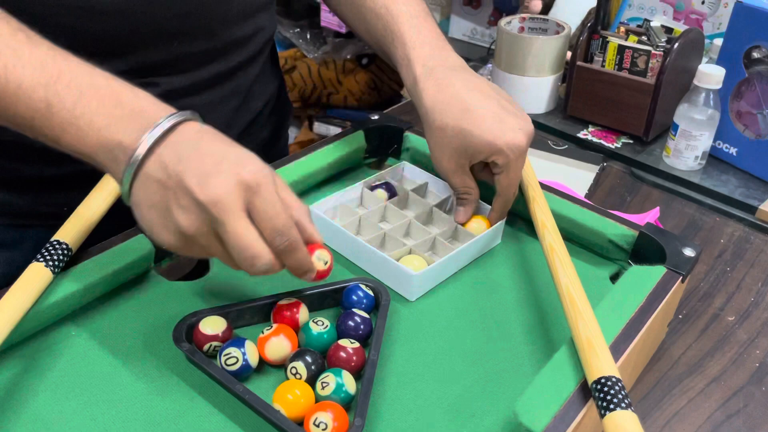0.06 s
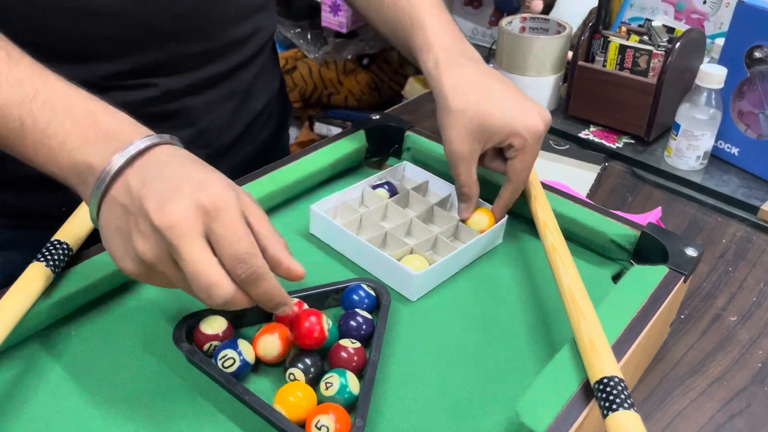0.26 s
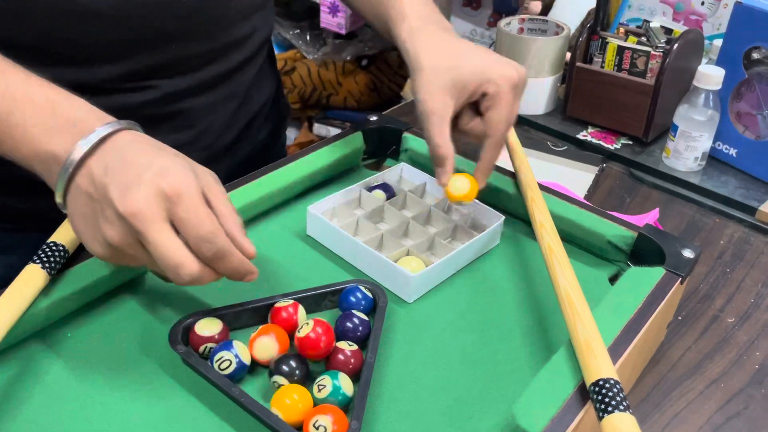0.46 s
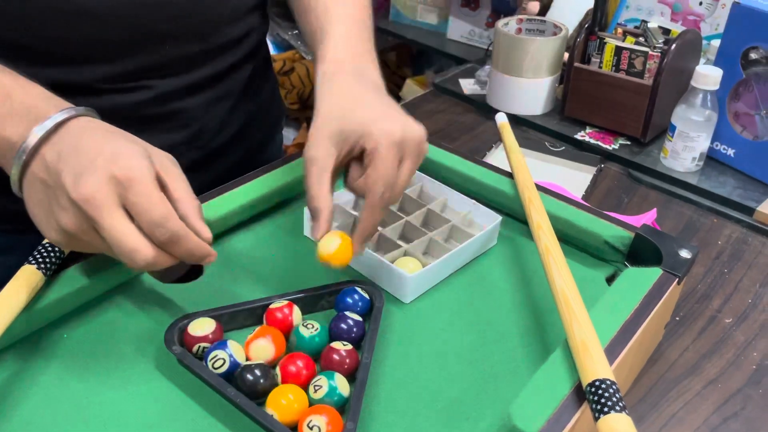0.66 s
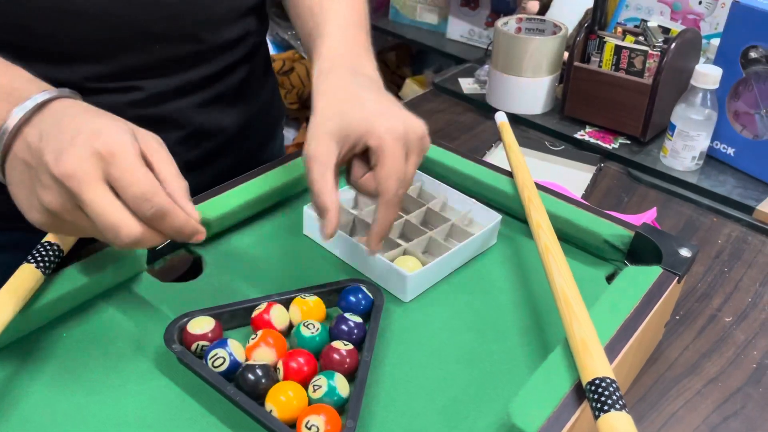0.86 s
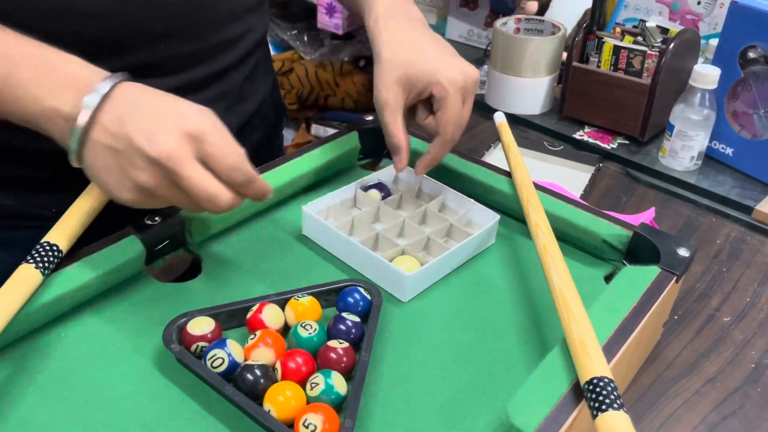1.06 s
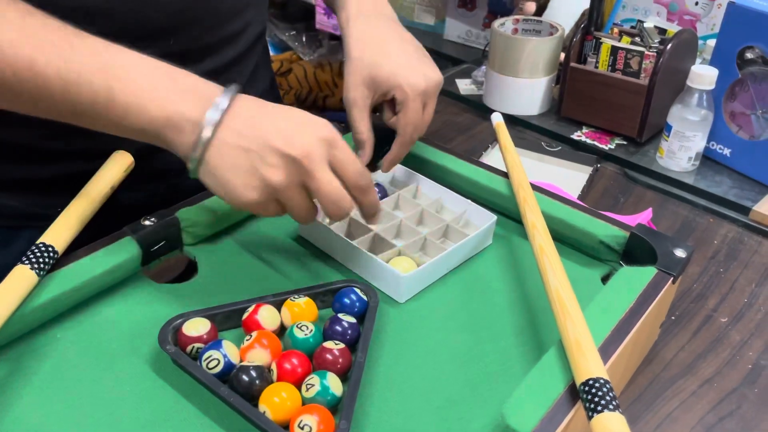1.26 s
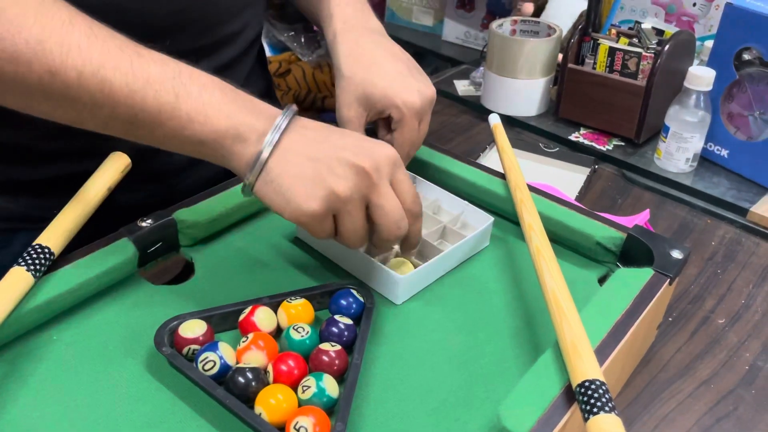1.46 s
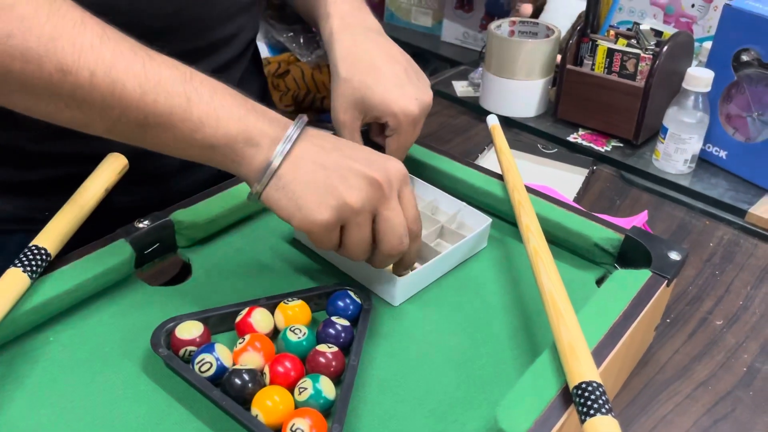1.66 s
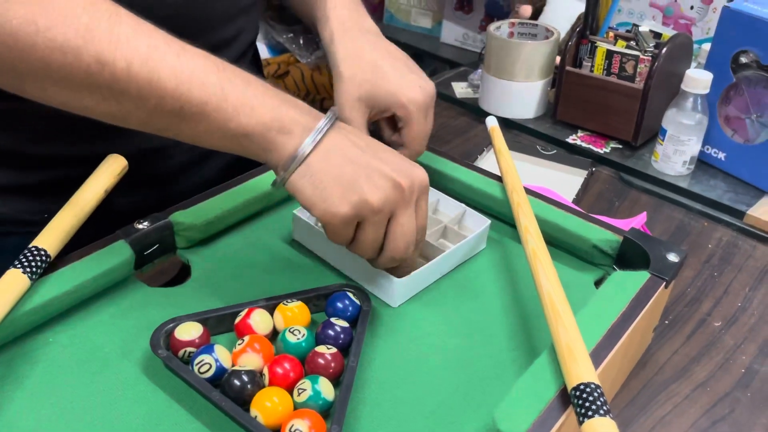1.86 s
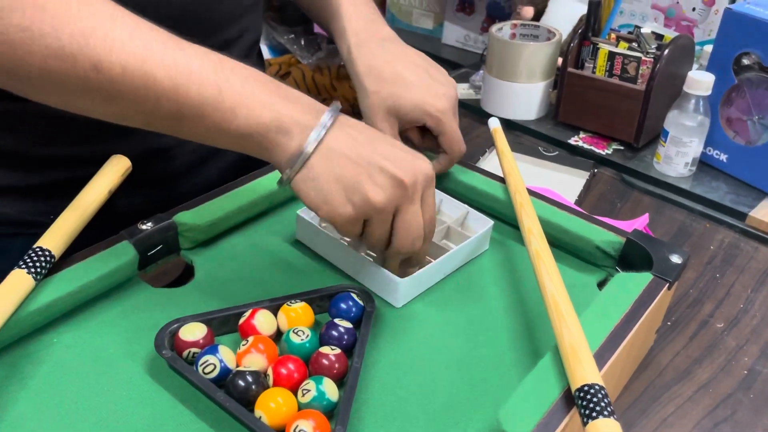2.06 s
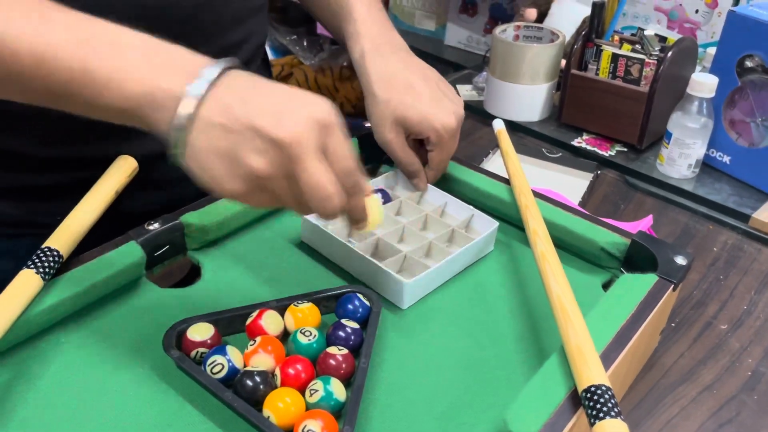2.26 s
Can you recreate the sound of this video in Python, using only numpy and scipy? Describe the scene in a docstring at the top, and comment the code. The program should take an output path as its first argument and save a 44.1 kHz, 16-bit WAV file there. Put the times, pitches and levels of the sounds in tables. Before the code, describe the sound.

Close by in a small room, little billiard balls drop into a plastic rack with sharp clicks and thumps, slightly left. Afterwards, fingers softly rub and tap cardboard dividers in a box, over a low room rumble.

```python
"""Small pool balls drop into a plastic rack on a toy table, close to a stereo microphone in a small room.
Each ball clicks on its neighbours, thumps the cloth-covered board and rattles the rack, a little left.
Then, just right of centre, fingers rummage for the next ball among the cardboard dividers of a box,
rubbing, tapping and scraping. A low room rumble lies under it all."""
import sys
import numpy as np
from scipy import signal
from scipy.fft import rfft, irfft, next_fast_len
from scipy.io import wavfile
from scipy.ndimage import uniform_filter1d, minimum_filter1d, map_coordinates

SR = 44100
rng = np.random.default_rng(int(sys.argv[2]) if len(sys.argv) > 2 else 0)


def generate_wav(signal):
    """Clip the signal to [-1, 1] and save it as 16-bit WAV at the path in sys.argv[1]."""
    frames = np.transpose(np.atleast_2d(signal))
    scaled = np.clip(frames, -1, 1) * 32767
    pcm = np.round(scaled).astype(np.int16)
    wavfile.write(sys.argv[1], SR, pcm)


N = 105840

# room tone, mid spectrum and side relative to mid: f/Hz, level/dB
RUMBLE_MID = [(15, -28), (25, -16), (38, -16.5), (54, -7), (75, -9.5), (110, -27.5), (180, -33.5),
              (300, -41), (450, -50), (780, -52.5), (1100, -57.5), (3000, -59.5), (5500, -73.5),
              (8000, -68.5), (12000, -70.5), (16000, -90.5)]
RUMBLE_SIDE = [(30, -16.5), (150, -12.5), (500, 2), (3000, -6)]
# reverberation: f/Hz, T60/s
ROOM_DECAY = [(150, .18), (500, .16), (1200, 0.15), (3000, 0.18), (7000, 0.15), (14000, 0.15)]

# ball on ball, ball on rack: t/s, relative level/dB, treble corner/Hz
BALL_CLICKS = [(.2204, -5.5, 8770), (.2251, -10, 8070), (.3770, -25, 5040), (.6018, -24, 11080),
               (.7604, -14, 12500), (.7615, -1.5, 9700), (.7625, -26.5, 7000), (.7873, -24.5, 5850),
               (.8041, -28.5, 7190)]
RACK_RATTLES = [(.2425, -14, 12000), (.3958, -30, 6360), (.4060, -38.5, 3155), (.5235, -55, 5000),
                (.6020, -12, 2300), (.6155, -18, 12000), (.6185, -24.5, 7000), (.6305, -29, 3870),
                (.7650, -17, 8996), (.7860, -15.5, 6500), (.7915, -19.5, 4500), (.8090, -12, 2500),
                (.8150, -26.5, 10000), (.8925, -68, 3970)]
# ball on board: t/s, relative level/dB, treble corner/Hz,
# travel time at 1 kHz direct/ms and via the rim/ms, gain of the rim path
BOARD_LANDINGS = [(0.2216, 5, 1202, 2.32, 3.65, 0.18), (0.3777, -10.5, 580, 2.5, 4.84, 0.4),
                  (0.6018, 2.5, 2400, 2.1, 3.49, .9), (0.6283, -14, 605, 2.9, 4.2, .5),
                  (0.7632, -1.5, 907, 2.2, 3.595, 0.5), (0.8079, 3.5, 2400, 2.12, 4.38, 0.2)]
# rubbing on cardboard, envelope: t/s, level/dB
RUB_ENVELOPE = [(1.36, -100), (1.431, -60.5), (1.484, -108), (1.551, -62.5), (1.59, -57.5), (1.646, -59.5),
                (1.669, -54.5), (1.72, -58.5), (1.764, -58), (1.803, -53), (1.838, -65.5), (1.875, -50),
                (1.929, -76), (1.999, -70), (2.03, -56.5), (2.09, -55.5), (2.151, -82), (2.349, -83),
                (2.4, -62)]
# fingers and ball on the box: t/s, relative level/dB, treble corner/Hz, divider pitch/Hz
BOX_TAPS = [(1.423, -41, 1500, 439), (1.510, -43.5, 14500, 1300), (1.540, -30.5, 4000, 320),
            (1.610, -38, 800, 662), (1.656, -36, 9000, 620), (1.867, -35, 1480, 235),
            (2.019, -27, 700, 420), (2.047, -40, 4100, 2680), (2.076, -42, 6000, 930),
            (2.088, -27, 1837, 497), (2.117, -25.5, 1780, 382), (2.236, -40.5, 4620, 2046)]
# strokes along a divider: t/s, hold/s, level/dB
DIVIDER_SCRAPES = [(1.784, 0.019, -55), (2.008, 0.072, -55)]

# modes of board, rack and hollow box: f/Hz, width/Hz, level/dB
BOARD_MODES = [(189.6, 39, -0.5), (237.5, 39, 0.15), (340.7, 18, -1.5), (380, 27, -2), (455, 40, -2),
               (569.6, 92, -4), (686.5, 83, -3.5), (822, 40, -8), (897, 35, -6), (1017, 97, -8.5),
               (1109, 108.5, -4.5), (1299, 75, -10), (1536, 83, -13), (2165, 72, -22)]
RACK_MODES = [(2150, 90, -4.5), (2370, 44, -0.5), (3030, 140, -2), (3520, 130, 6), (4000, 76, -6),
              (4530, 200, 1), (6520, 200, 3.5)]
BOX_MODES = [(231, 75, 8), (332.2, 30, 5), (413, 46, 6), (652, 95, 1), (1057, 170, 0), (1390, 66, 1.5),
             (1767, 94, -0.5), (2100, 41, -6.5), (2450, 130, -5.5), (3220, 110, -8)]
# broad spectrum of each kind of contact: f/Hz, level/dB
CLICK_SPECTRUM = [(500, -28.5), (1900, -15), (3000, -7.5), (5000, -2.5), (6700, -1), (10000, -4.5),
                  (16000, -11.5)]
RATTLE_SPECTRUM = [(300, -10), (1000, 8), (2200, 4), (3400, 1), (4500, -1.5), (5400, -13.5), (6600, -10),
                   (10000, -7.5), (16000, -17)]
RUB_SPECTRUM = [(100, -8), (200, 6.5), (400, -2), (1500, -6.5), (3000, -11), (5000, -21.5), (6500, -17.5),
                (12000, -24.5), (16000, -37.5)]
TAP_SPECTRUM = [(100, -9), (220, 9), (400, 4), (700, -1.5), (1500, 1), (2500, -1.5), (3500, -1.5),
                (6500, -15), (12000, 4.5), (16000, -13)]
SCRAPE_SPECTRUM = [(500, -7.5), (1500, -2.5), (2500, 5), (4000, -3.5), (5000, -12.5), (6500, -2),
                   (8000, -20), (10500, -6.5), (13000, -14), (16000, -27.5)]

# the table at the microphone: f/Hz, left over right/dB
TABLE_BALANCE = [(60, -1), (110, .3), (380, .6), (700, 3.5), (1200, 6.5), (2380, 2.3), (4400, 3.3),
                 (8000, .3), (15000, .5)]
# the same in phase: f/Hz, left lead/rad
TABLE_LEAD = [(100, 0), (350, .2), (1200, .6), (2800, 1.1), (6000, 1.2), (10000, 2), (14000, 2.4)]
# microphone response: f/Hz, gain/dB
MIC_RESPONSE = [(6800, 2), (7400, -3), (8000, -16.5), (9000, -7), (9900, -1), (13000, -1.5), (16000, -7)]

TIME = np.arange(N) / SR
BLOW_SAMPLES = 8192
BLOW_HZ = np.fft.rfftfreq(BLOW_SAMPLES, 1 / SR)


def amp(db):
    """Decibels to gain."""
    return 10 ** (np.asarray(db) / 20)


def unit(x):
    """Scale to rms 1."""
    return x / np.sqrt(np.mean(x ** 2) + 1e-20)


def along(points, hz):
    """Read (f/Hz, value) points on a log axis."""
    f, values = np.transpose(points)
    return np.interp(np.log(hz + 1), np.log(f + 1), values)


def filtered(x, response):
    """Filter x by a complex function of frequency."""
    size = next_fast_len(N + SR // 2)
    return irfft(rfft(x, size) * response(np.fft.rfftfreq(size, 1 / SR)), size)[..., :N]


def causal(gain):
    """The minimum-phase response with this gain."""
    cepstrum = irfft(np.log(np.maximum(gain, 1e-6)))
    half = len(cepstrum) // 2
    cepstrum[1:half] *= 2
    cepstrum[half + 1:] = 0
    return np.exp(rfft(cepstrum))


def add(track, s, sound):
    """Mix a sound in at time s."""
    part = track[max(round(s * SR), 0):][:len(sound)]
    part += sound[:len(part)]


def resonances(modes, hz):
    """Gain of a set of modes, summed in power."""
    return np.sqrt(sum(amp(2 * db) / (1 + ((hz - f) / (0.68 * width)) ** 2) ** 2
                       for f, width, db in modes))


def body(colour, modes, hz):
    """Gain of an object: a broad colour with its modes on top."""
    return np.hypot(amp(along(colour, hz)), resonances(modes, hz))


def contacts(rows, colour, modes, t60_s, scatter_db=3):
    """Each contact is a fast-dying burst that rings the object; a lower corner makes it duller."""
    out = np.zeros(N)
    decay = amp(-60 * TIME[:BLOW_SAMPLES] / t60_s)
    for s, db, corner_hz in rows:
        burst = rfft(rng.standard_normal(BLOW_SAMPLES) * decay)
        smooth_power = np.abs(uniform_filter1d(np.abs(burst) ** 2, size=200))
        flat_burst = burst / causal(np.sqrt(smooth_power))
        struck = [(f, width, level + rng.normal(0, scatter_db)) for f, width, level in modes]
        gain = body(colour, struck, BLOW_HZ) / np.sqrt(1 + (BLOW_HZ / corner_hz) ** 4)
        add(out, s, amp(db + 12) * irfft(flat_burst * causal(gain))[:len(BLOW_HZ)])
    return out


def friction(colour, modes, grain_db=2.8, grains_per_s=350):
    """Grainy sliding noise of rms 1 in an object's colour."""
    noise = rng.standard_normal(N)
    roughness = map_coordinates(rng.standard_normal(4096), [TIME * grains_per_s], mode="wrap")
    grains = noise * amp(grain_db * roughness)
    return unit(filtered(grains, lambda hz: body(colour, modes, hz)))


def room(x, wet_db, renew_s=0.2, build_s=0.005):
    """Direct sound plus a short diffuse stereo room tail, drawn afresh every 0.2 s."""
    out = np.array([x, x])
    step = round(renew_s * SR)
    for start in range(0, N, step):
        hz, t, noise = signal.stft(rng.standard_normal((3, SR // 3)), SR, nperseg=256)
        decay = amp(-60 * t / along(ROOM_DECAY, hz)[:, None])
        tail = signal.istft(noise * decay, SR, nperseg=256)[1]
        tail *= 1 - np.exp(-TIME[:tail.shape[1]] / build_s)
        tail = tail[:2] + 1.3 * tail[2]  # the third noise is common to both channels
        tail /= np.linalg.norm(tail[0])
        wet = amp(wet_db) * signal.fftconvolve(x[None, start:start + step], tail, axes=1)
        for channel, sound in zip(out, wet):
            add(channel, start / SR, sound)
    return out


def room_tone(level_db=-46.5):
    """The room's steady low rumble and faint hiss."""
    mid, side = filtered(rng.standard_normal((2, N)), lambda hz: amp(along(RUMBLE_MID, hz)))
    side = filtered(side, lambda hz: amp(along(RUMBLE_SIDE, hz)))
    return amp(level_db) * unit(np.array([mid + side, mid - side]))


def ball_clicks():
    """Hard balls meet in a bright click with no ring."""
    return room(contacts(BALL_CLICKS, CLICK_SPECTRUM, [], t60_s=0.0064), wet_db=-5)


def bending(hz, travel_ms, fastest_hz=2500):
    """A path through the board: speed grows as the root of frequency; delay is zero at fastest_hz."""
    cycles = 2 * travel_ms * np.sqrt(hz / 1000) * (1 - np.sqrt(hz / fastest_hz) / 2)
    return np.exp(-2j * np.pi * cycles)


def board_thumps(low_cut_hz=135.35, contact_order=3.67):
    """Bending waves cross the board, direct and via the rim; highs lead, so each thump chirps down."""
    out, hz = np.zeros(N), BLOW_HZ
    bass_loss = 1 + (low_cut_hz / (hz + 1)) ** 6
    for s, db, corner_hz, direct_ms, rim_ms, rim_gain in BOARD_LANDINGS:
        treble_loss = 1 + (hz / corner_hz) ** (2 * contact_order)
        gain = resonances(BOARD_MODES, hz) / np.sqrt(treble_loss * bass_loss)
        paths = bending(hz, direct_ms) + rim_gain * bending(hz, rim_ms)
        add(out, s, amp(db + 33.5) * irfft(causal(gain) * paths)[:-SR // 50])
    return room(out, wet_db=-19)


def rack_rattles():
    """Jostling balls ring the plastic rack."""
    return room(contacts(RACK_RATTLES, RATTLE_SPECTRUM, RACK_MODES, t60_s=0.024), wet_db=-5)


def box_rub():
    """Fingers slide over cardboard and stir the hollow box."""
    return friction(RUB_SPECTRUM, BOX_MODES) * amp(np.interp(TIME, *np.transpose(RUB_ENVELOPE)))


def box_taps(divider_width_hz=110, divider_db=11):
    """Each light tap rings the box and the one divider it strikes."""
    out = np.zeros(N)
    for *tap, divider_hz in BOX_TAPS:
        modes = BOX_MODES + [(divider_hz, divider_width_hz, divider_db)]
        out += contacts([tap], TAP_SPECTRUM, modes, t60_s=0.02)
    return out


def divider_scrapes(attack_s=0.0027, release_s=0.0139):
    """Brisk strokes along a divider give short spells of bright friction."""
    strokes = np.zeros(N)
    for s, hold_s, db in DIVIDER_SCRAPES:
        edges = s + np.cumsum([0, attack_s, hold_s, release_s])
        strokes += amp(db) * np.interp(TIME, edges, [0, 1, 1, 0])
    return strokes * friction(SCRAPE_SPECTRUM, [])


def scene(box_right_db=0.5):
    """From the microphone, the rack lies a little to the left, the box just to the right."""
    leftward = np.array([[0.5], [-0.5]])
    table = board_thumps() + ball_clicks() + rack_rattles()
    table = filtered(table, lambda hz: amp(leftward * along(TABLE_BALANCE, hz)))
    table = filtered(table, lambda hz: np.exp(1j * leftward * along(TABLE_LEAD, hz)))
    box = room(box_rub() + box_taps() + divider_scrapes(), wet_db=-4)
    return table + box * amp(-leftward * box_right_db) + room_tone()


def record(dry, ceiling=0.93, hold_s=0.0017, top_hz=16400):
    """The microphone has a treble notch; a fast limiter holds the thumps down ahead of a high cut."""
    mic = filtered(dry, lambda hz: amp(along(MIC_RESPONSE, hz)))
    hold = round(hold_s * SR)
    needed = ceiling / np.maximum(np.abs(mic).max(axis=0), ceiling)
    gain = uniform_filter1d(minimum_filter1d(needed, hold), hold)
    return filtered(mic * gain, lambda hz: hz < top_hz)


dry = scene()
out = record(dry)
generate_wav(out)
```